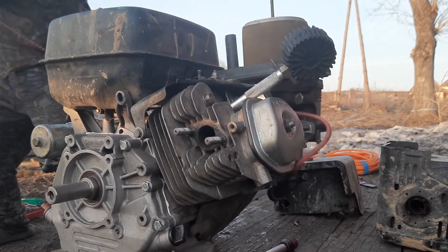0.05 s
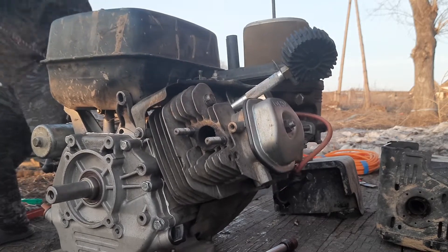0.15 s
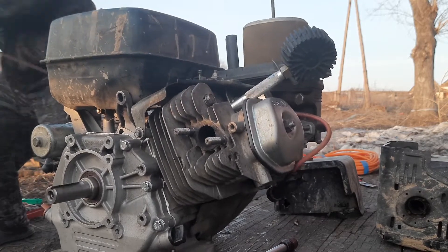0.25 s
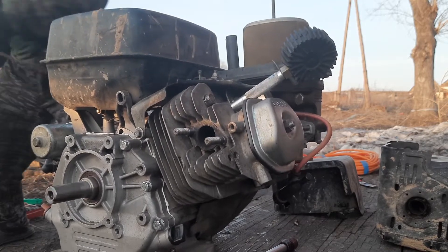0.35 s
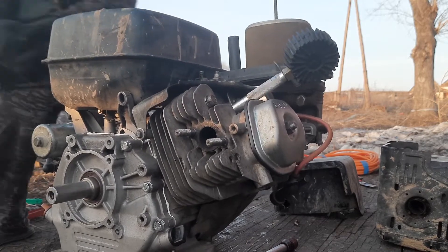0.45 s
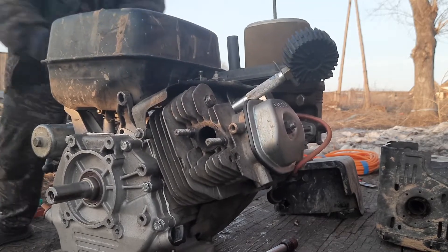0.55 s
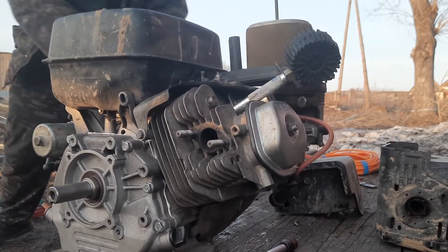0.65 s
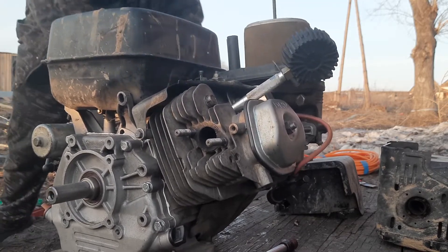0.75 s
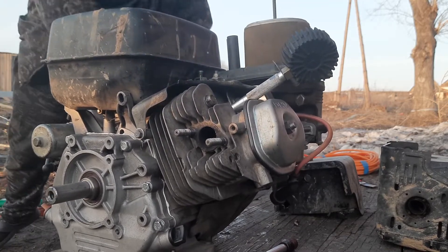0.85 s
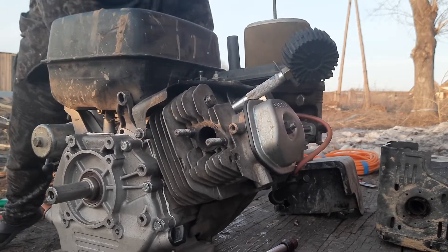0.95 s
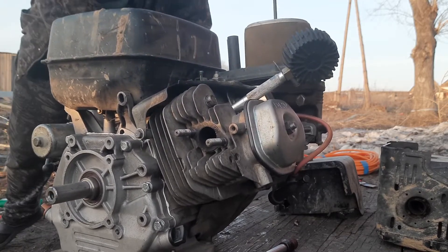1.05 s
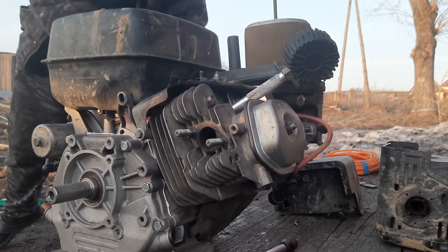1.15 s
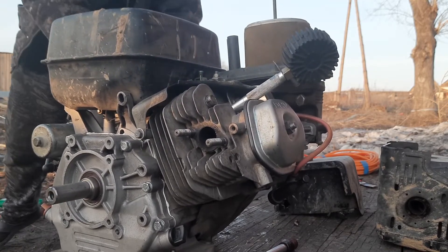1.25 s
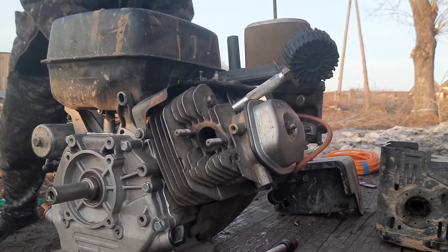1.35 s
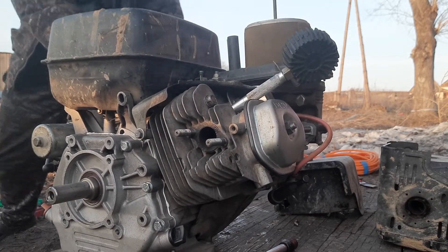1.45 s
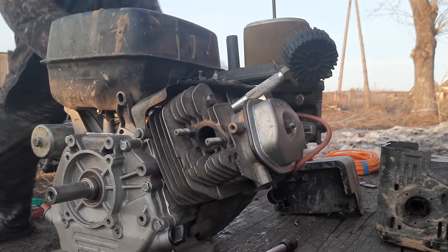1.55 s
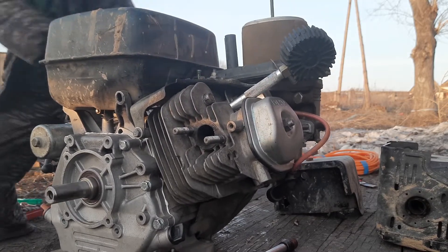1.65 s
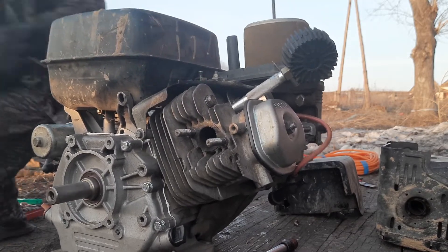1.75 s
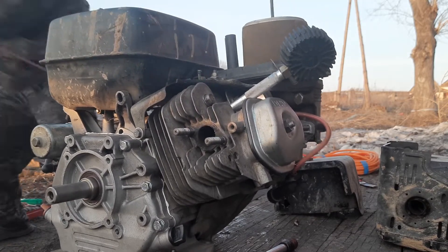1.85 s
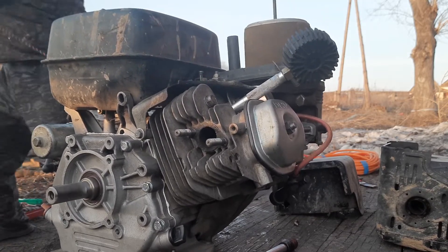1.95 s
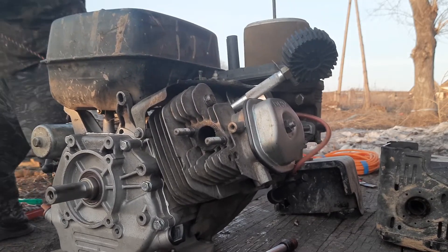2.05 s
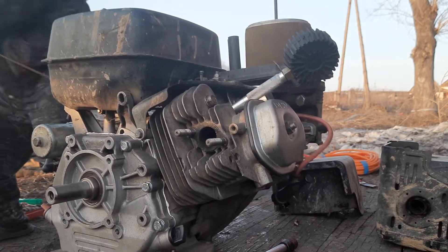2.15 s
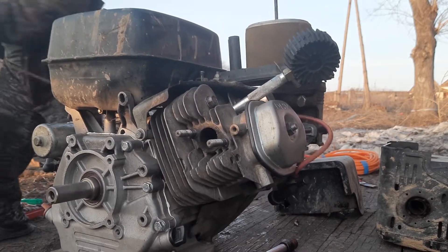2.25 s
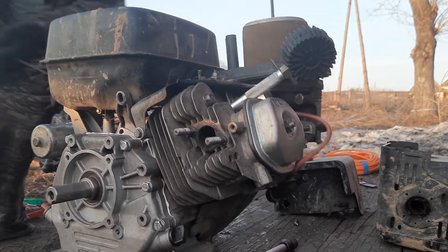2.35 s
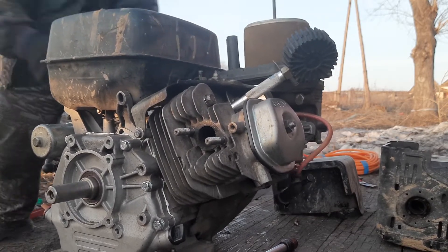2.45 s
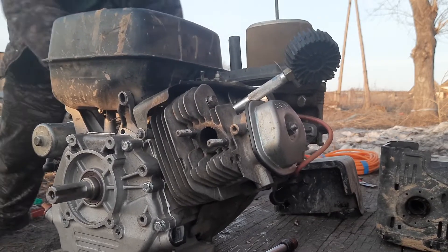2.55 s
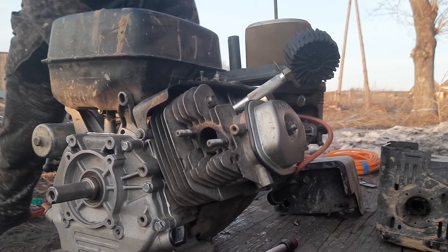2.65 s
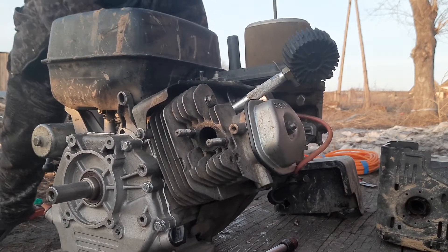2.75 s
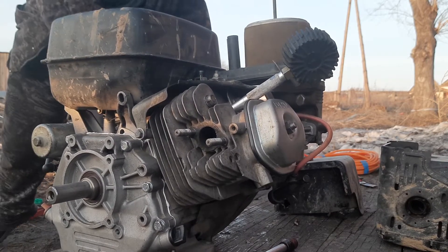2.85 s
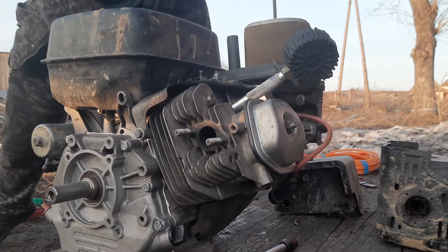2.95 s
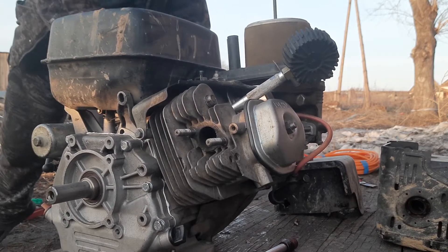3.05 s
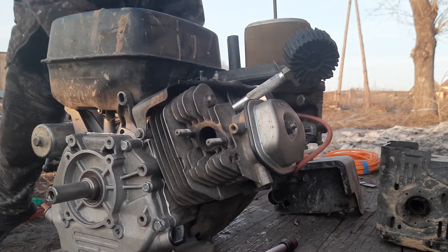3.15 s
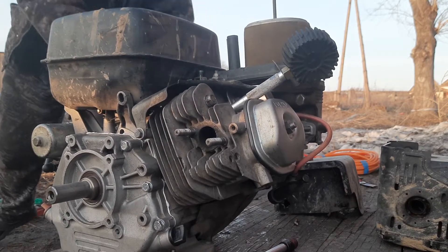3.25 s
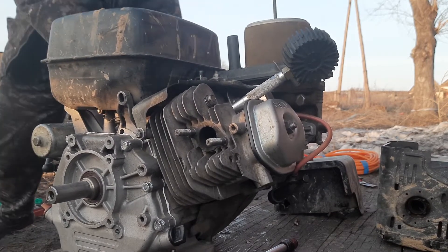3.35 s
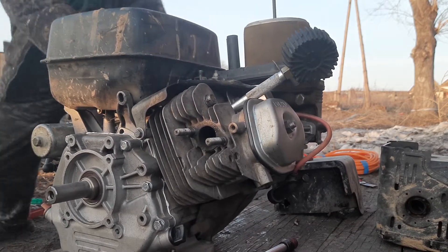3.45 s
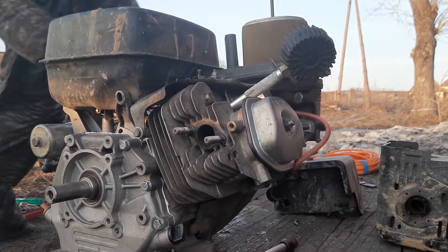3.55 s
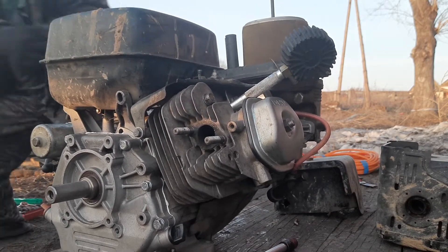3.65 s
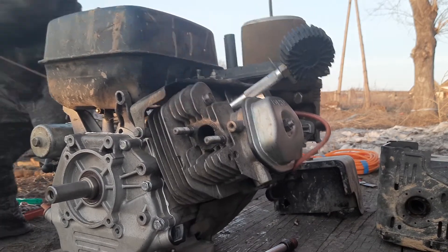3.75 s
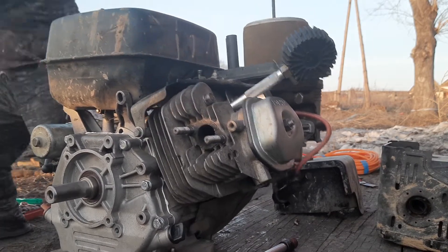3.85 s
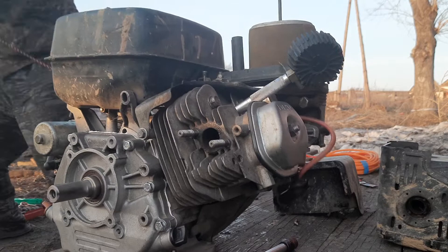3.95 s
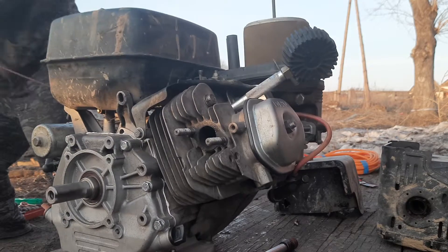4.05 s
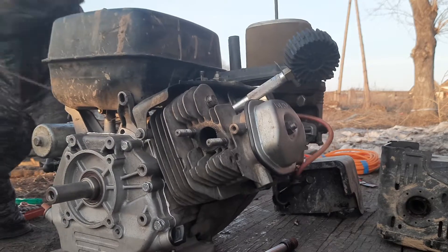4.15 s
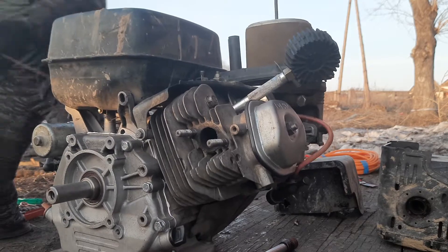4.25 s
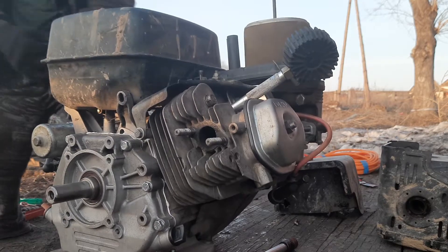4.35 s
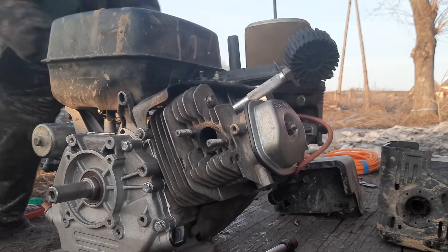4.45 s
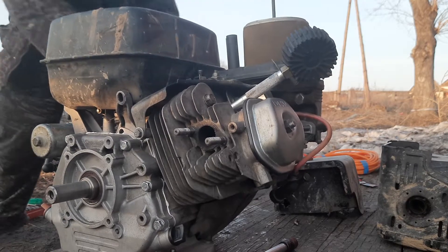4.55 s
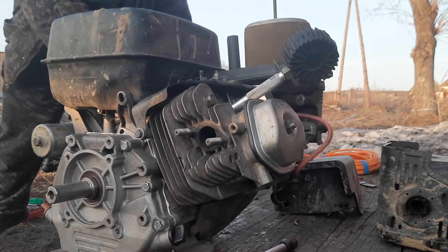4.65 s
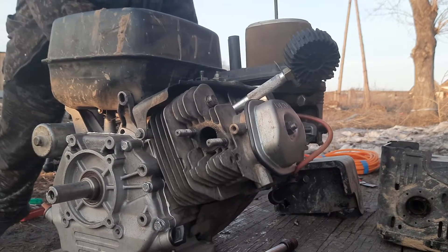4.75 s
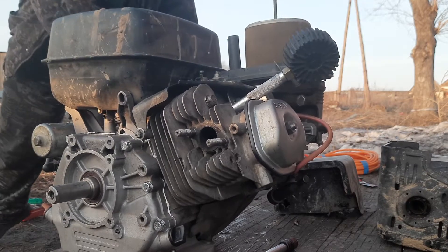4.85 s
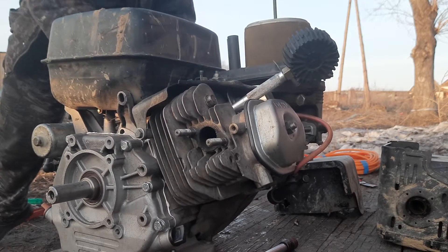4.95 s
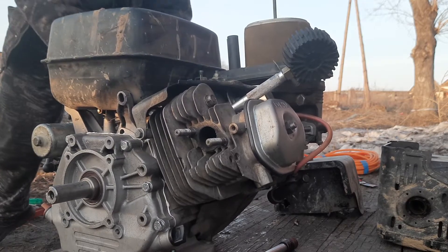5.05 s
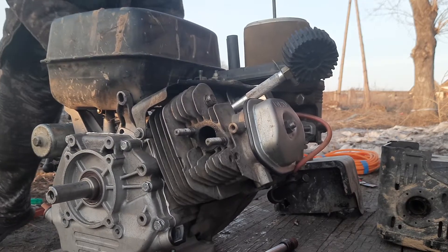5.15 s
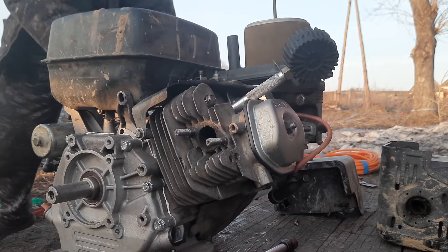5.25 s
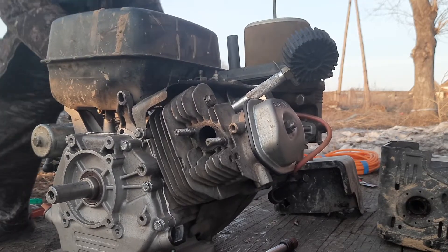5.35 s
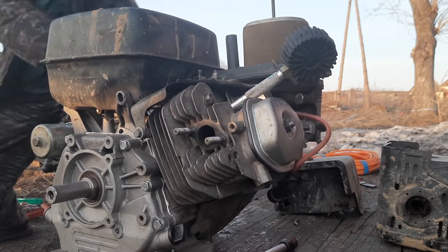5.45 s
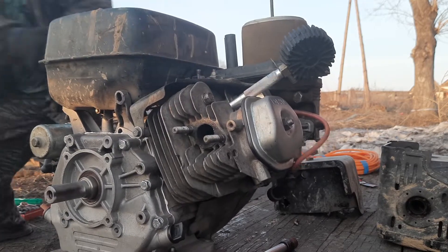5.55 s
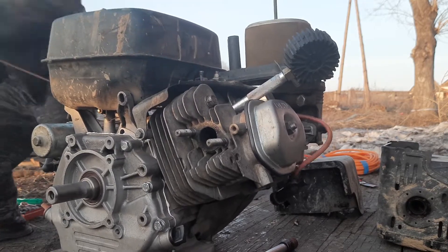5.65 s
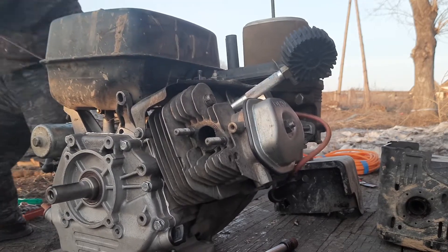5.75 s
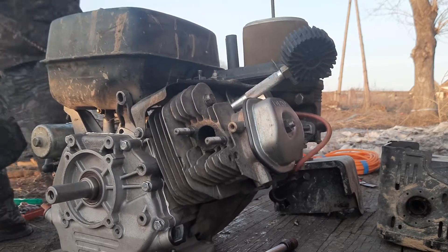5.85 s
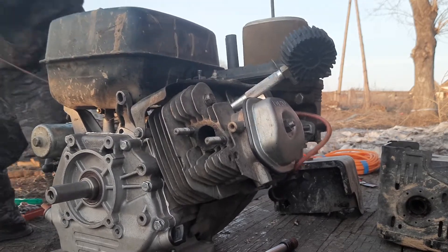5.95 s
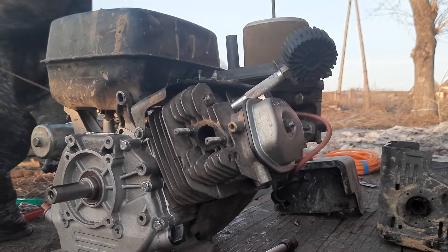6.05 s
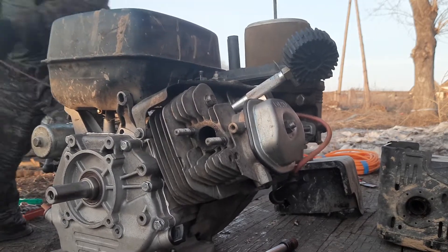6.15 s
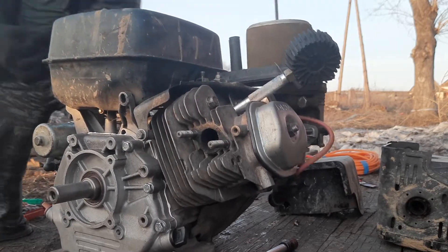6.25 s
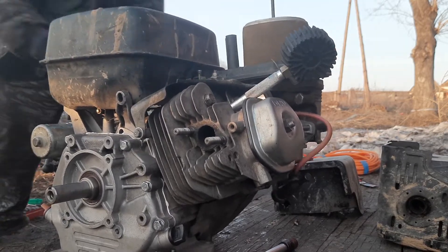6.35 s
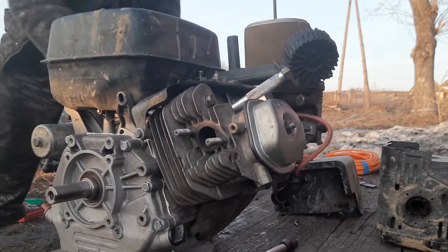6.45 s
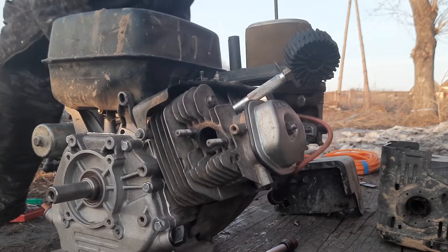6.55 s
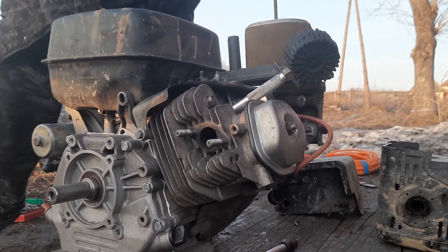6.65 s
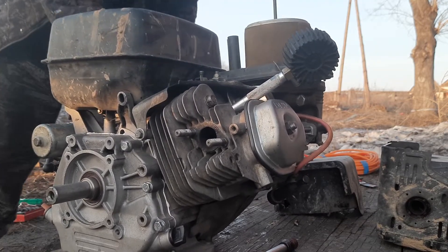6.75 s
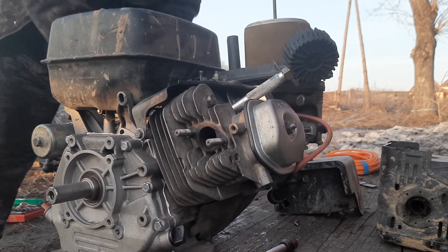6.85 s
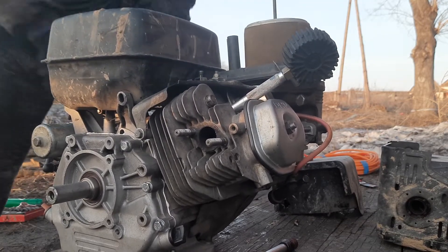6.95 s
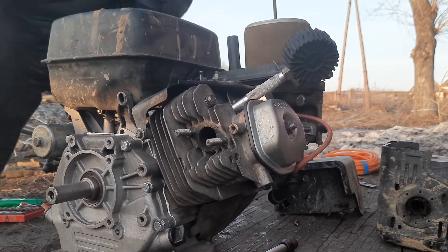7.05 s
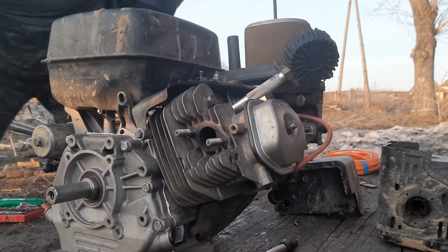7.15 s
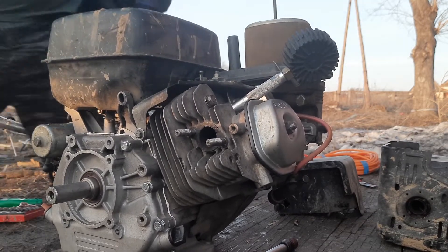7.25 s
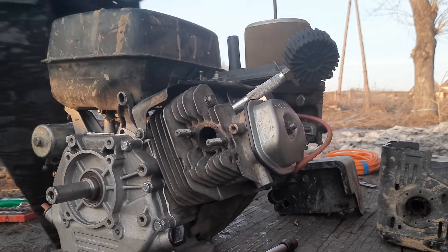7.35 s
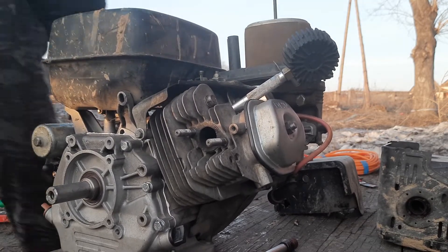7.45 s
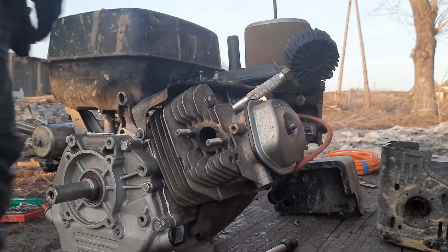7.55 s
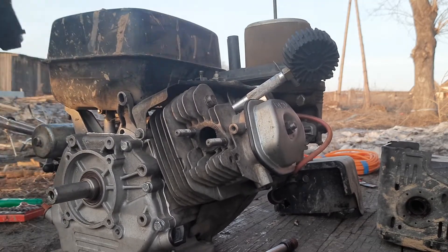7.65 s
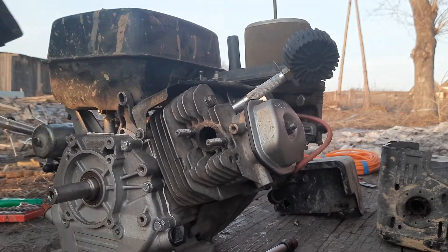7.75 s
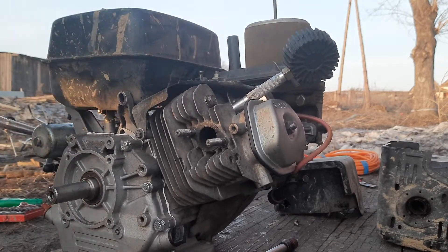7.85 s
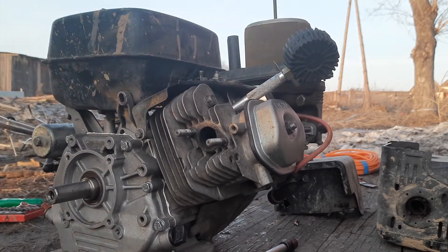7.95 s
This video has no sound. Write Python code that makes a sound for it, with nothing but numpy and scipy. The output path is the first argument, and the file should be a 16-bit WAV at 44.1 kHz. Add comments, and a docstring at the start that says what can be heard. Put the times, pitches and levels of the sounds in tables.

```python
"""Knocks on a wooden bench, already under way: a single-cylinder engine is cranked by its recoil starter.
Four pulls, none of which fires: the piston gulps air, the block knocks, ports puff, pawls and valve gear clink,
the rope rasps out and winds back; at the end boots shuffle away. Decaying tones make the knocks and gulps,
shaped noise and ringing random contacts the rest. Close stereo microphone with a yard around it: the left
port is covered, dull and hollow; the right one is open and bright."""
import sys
import numpy as np
from scipy import signal
from scipy.fft import rfft, irfft, next_fast_len
from scipy.io import wavfile

SR = 44100
rng = np.random.default_rng(int(sys.argv[2]) if len(sys.argv) > 2 else 0)


def dump_mix(stems):
    """Bounce the given channels to the path in sys.argv[1] as a 16-bit WAV at rate SR."""
    frames = np.atleast_2d(stems).T  # one column per channel
    limited = np.clip(frames, -1, 1)  # hard clip at full scale
    pcm = np.round(limited * 32767).astype(np.int16)
    wavfile.write(sys.argv[1], SR, pcm)


N = 352359
TIME = np.arange(N) / SR  # s

# Levels in the tables are those of each source before its trim and the microphone mix.

# Background of the yard. Each row: frequency in Hz, relative density in dB per Hz.
YARD_COLOUR = [(20, -14.5), (40, -27.5), (65, -1.5), (100, -1), (200, -5.5), (300, -11.5), (550, -13),
               (750, -25), (1000, -53), (2000, -70), (8000, -67.5)]
# Boots and clothes as the person steps away. Each row: peak in seconds, length in seconds,
# weight in dB, rustle in dB (both against the shuffle level of the rubbing layers).
SHUFFLES = [(7.296, 0.12, -6, -12), (7.61, 0.23, -5, -26.5), (7.853, 0.065, 1.5, -0.5),
            (7.98, 0.089, -1, -6)]

# Pulls of the rope. Each row: crank up to speed in seconds, take-up in seconds, hold in seconds,
# coast in seconds, stopping in seconds, strength in dB against full speed.
PULLS = [(-.3, .15, 0.26, 0.75, 0.16, 1), (1.653, 0.15, 0.33, 0.68, 0.18, 0),
         (3.61, 0.17, 0.33, 0.59, 0.23, -1.5), (5.556, 0.21, 0.27, 0.68, 0.17, -1)]
# Motion against full speed: rope still slack, loss by the end of the coast, crank at rest
SLACK_DB, COAST_LOSS_DB, STOPPED_DB = -50.5, -10.5, -37
RUN_OUT_S, STILL_DB = 0.27, -62.5  # the drum spins on and comes to rest
# The piston passes top dead centre. Each row: peak in seconds, gulp level in dB,
# dip in motion just before it in dB.
COMPRESSIONS = [(0.091, -15, -1), (.334, -15.5, 7.5), (1.77, -10, 8.5), (1.939, -12.5, 3.5), (2.13, -16, 6),
                (2.372, -37, 8), (2.7, -44, 6), (3.767, -11, -2), (4.159, -16, 5.5), (4.44, -50, 10.5),
                (5.639, -13, 2.5), (5.804, -13.5, -1), (5.997, -17, 5.5), (6.236, -32, 8)]
LABOUR_LEAD_S, LABOUR_S = 0.056, 0.038  # lead of the dip before the top, and its time scale
SURGE_LAG_S, SURGE_SHARE = 0.04, 0.18  # squeezed air then kicks the piston on: share of the dip returned
SHAKE_LAG_S = 0.018  # the bench starts to shake only once the pawls have caught
# The spring winds the rope home. Each row: arrival in seconds, length in seconds,
# level in dB against the rewind level of the rubbing layers.
REWINDS = [(1.199, 0.092, -4), (3.186, .04, 0.5), (5.078, 0.14, -3.5)]
SLIDE_S, SLIDE_DB = 0.2, -15  # before arrival the rope also slides softly through its guide

# Four rubbing layers. Each row: level at full speed in dB, dB per dB of motion, dB per dB of dip,
# rewind level in dB, shuffle level in dB, level at rest in dB.
THRUM = (-23, 0.66, 1, -42.5, -57, -67)
RASP = (-25, 1.0, 0.5, -49.5, -52.5, -76.5)
HISS = (-32, 1.39, 1.6, -60, -63, -86)
RUMBLE = (-37.5, 0.54, 1.2, -68, -42.5, -50)

# Colours of bench shudder and rope rasp. Each row: frequency in Hz, relative density in dB per Hz.
THRUM_COLOUR = [(100, -22), (220, -11), (330, -0.5), (410, -7), (490, 7), (580, 0.5), (700, -11),
                (860, -14), (1100, -22), (1400, -32), (2000, -45), (3500, -64), (6000, -76)]
RASP_COLOUR = [(60, -24), (200, -8.5), (350, 5.5), (480, 5.5), (600, 0.5), (830, 3), (1100, -1.5),
               (2100, -5.5), (3500, -12.5), (4600, -19.5), (6000, -18), (8000, -15.5), (10000, -24),
               (14500, -20.5)]

# Light taps of the rewinding starter and handle. Each row: start in seconds, body in dB,
# edge in dB, pitch in Hz.
CLACKS = [(0.752, -19.5, -32, 497), (0.895, -35, -46, 479), (0.922, -35.5, -58, 483),
          (1.158, -37, -43.5, 650), (1.202, -34.5, -43, 520), (2.828, -41, -41.5, 585),
          (2.888, -44, -50, 472), (3.165, -27.5, -48, 624), (3.189, -25, -41, 632), (4.592, -24, -34, 490),
          (4.638, -24, -36, 513), (4.97, -42, -80, 657), (5.005, -37.5, -68, 645), (5.042, -32, -64, 570),
          (5.084, -26, -41.5, 515), (5.22, -54, -58, 500), (6.613, -28, -36.5, 516),
          (6.667, -34, -39.5, 514), (6.768, -41.5, -55, 463)]
# Dry edge of those taps. Each row: frequency in Hz, relative density in dB per Hz.
CLACK_EDGE = [(300, 1.5), (800, 13), (1500, 4), (3300, -2.5), (5000, -11), (9000, -18), (15000, -48)]

# Sharp contacts of rockers and pawls. Each row: start in seconds, level in dB.
TICKS = [(.354, -35), (.892, -58), (1.202, -42), (1.791, -21.5), (2.134, -21.5), (2.627, -31.5),
         (2.944, -55), (3.659, -22), (3.76, -17), (4.185, -23.5), (5.085, -39.5), (6.023, -21.5),
         (6.491, -32.5)]
# Their colour. Each row: frequency in Hz, relative density in dB per Hz.
TICK_COLOUR = [(500, -13.5), (1500, -3), (4000, 2.0), (8000, 2.5), (15000, -9)]

# Rope and dry bushings squeak. Each row: peak in seconds, level in dB, pitch in Hz.
SQUEAKS = [(0.057, -13.5, 15100), (.090, -21.5, 7880), (0.382, -27.5, 3370), (.51, -33, 2813),
           (1.765, -17.5, 8000), (1.81, -22.5, 5780), (2.286, -36, 5800), (2.444, -30, 1442),
           (3.764, -11.5, 7500), (3.837, -23, 15200), (3.894, -21.5, 7180), (4.16, -22.5, 7440),
           (4.255, -28, 1460), (4.549, -34.5, 2710), (4.965, -47.5, 8180), (5.539, -25.5, 5680),
           (5.637, -14, 7850), (6.066, -24.5, 2740), (6.319, -30.5, 1430)]

# Air through the ports. Each row: peak in seconds, level in dB, length in seconds.
PUFFS = [(0.056, -14, 0.0067), (0.223, -27, 0.0068), (0.554, -24.5, 0.015), (0.591, -26.5, 0.011),
         (0.619, -29, 0.004), (0.694, -29, 0.021), (1.658, -21.5, 0.012), (1.765, -20, 0.01),
         (1.825, -23.5, 0.019), (1.888, -21, 0.004), (2.045, -16.5, 0.012), (2.29, -21.5, 0.015),
         (2.367, -25.5, 0.0049), (3.699, -13, 0.011), (3.789, -17, 0.02), (3.879, -20, 0.015),
         (4.358, -15.5, 0.023), (4.435, -24.5, 0.0063), (4.48, -28, 0.021), (5.545, -17.5, 0.014),
         (5.85, -26.5, 0.03), (5.914, -17.5, 0.013), (6.152, -14, 0.018), (6.236, -25, 0.0073),
         (6.269, -29, 0.0096), (6.398, -31.5, 0.015)]
# Colour of the jet. Each row: frequency in Hz, relative density in dB per Hz.
PUFF_COLOUR = [(250, -21.5), (500, 0.5), (1000, -6.5), (1400, 1), (2100, -2.5), (2900, -8), (3800, 1),
               (4500, -9.5), (6000, -4), (8500, -6), (10000, -17.5), (12000, -7), (15000, -18)]
# Resonances of ports and head. Each row: frequency in Hz, relative drive in dB, 60 dB decay in seconds.
PORTS = [(1455, -2.5, 0.027), (2114, -1.5, 0.032), (3320, -6, 0.075), (4060, -4.5, 0.038)]

# Pawls and valve gear chatter. Each row: peak in seconds, level in dB, length in seconds.
CLINKS = [(0.054, -13.5, 0.0061), (0.147, -15, 0.014), (0.317, -24.5, 0.019), (0.383, -28, 0.011),
          (0.414, -16.5, 0.012), (1.763, -13, 0.0068), (1.827, -13, 0.016), (1.876, -13, 0.0076),
          (1.99, -21, 0.035), (2.05, -18, 0.0064), (2.195, -17.5, 0.022), (2.274, -30, 0.032),
          (2.43, -19.5, 0.013), (3.619, -13, 0.011), (3.699, -16, 0.00806), (3.764, -16.5, 0.0059),
          (3.815, -11, 0.013), (3.988, -19, 0.013), (4.058, -23.5, 0.011), (4.24, -20, 0.02),
          (4.542, -28.5, 0.01), (5.86, -23, 0.033), (6.068, -17, 0.023), (6.308, -24, 0.02)]
# Colour of the chatter. Each row: frequency in Hz, relative density in dB per Hz.
CLINK_COLOUR = [(1500, -29.5), (4500, -13.5), (5800, -7), (6700, -10.5), (7800, 0), (9800, -8.5),
                (12000, -6), (15000, -15.5)]
# Ringing steel parts. Each row: frequency in Hz, relative drive in dB, 60 dB decay in seconds.
STEEL = [(1400, -16, 0.033), (2856, -6.5, 0.12), (2890, 5, 0.055), (5230, -10.5, 0.044),
         (5610, -2.5, 0.074), (7240, -5, 0.038), (6760, -5.5, 0.16), (7180, -2.5, 0.056),
         (8540, 2.5, 0.023), (8800, -4, .07), (9170, -3.5, 0.19), (10300, -15.5, .07), (11700, -12, 0.069),
         (14020, -6.5, 0.063)]
RATTLES_PER_S, RATTLE_DB, RATTLE_T60_S = 77, -12, 0.06  # loose steel parts; level against the rasp
RATTLE_LOW_HZ, RATTLE_HIGH_HZ = 862, 8840

# The boards ring on. Each row: frequency in Hz, level passed at that pitch in dB, 60 dB decay in seconds.
BENCH = [(483, -8, 0.38), (857, 4, 0.17)]
# The block knocks on the bench. Each row: peak in seconds, peak of the tone's envelope in dB, pitch in Hz.
KNOCKS = [(0.022, -5, 514), (0.097, -2.5, 483), (0.213, -13.5, 572), (0.305, -1, 489), (0.359, -13.5, 460),
          (0.519, -26, 450), (0.689, -21, 590), (1.773, -5, 467), (1.798, -9.5, 475), (1.879, -3.5, 530),
          (1.96, -8, 512), (2.049, -8, 542), (2.126, 0, 506), (2.277, -11.5, 543), (2.52, -18.5, 485),
          (2.587, -19, 487), (2.699, -18, 623), (3.607, -15, 580), (3.699, -10, 565), (3.789, -0.5, 529),
          (3.867, -8.5, 578), (3.936, 0, 493), (4.069, -4.5, 486), (4.143, -10.5, 393), (4.19, -16.5, 526),
          (5.619, -9.5, 560), (5.647, -1, 488), (5.682, -14.5, 500), (5.744, -5, 534), (5.812, -4.5, 509),
          (5.851, -11, 495), (5.915, -11, 503), (5.998, -1.5, 498), (6.03, -11, 520), (6.133, -15, 434),
          (6.396, -6.5, 492)]
REBOUND_S, REBOUND_DB = 0.024, -10  # the block rocks back after each knock

# Airborne sound through the covered left port. Each row: frequency in Hz, gain in dB.
COVER = [(200, 3), (500, 3.5), (900, -21.5), (1400, -20), (2000, -23), (3500, -32.5), (5000, -49.5),
         (10000, -56.5), (15000, -27.5)]
CUTOFF_HZ = 16000


def from_db(db):
    """Decibels to gain."""
    return 10 ** (np.asarray(db) / 20)


def rms_one(x):
    """Scale to unit rms."""
    return x / np.sqrt(np.mean(x ** 2) + 1e-20)


def colour(x, points):
    """Filter by a spectrum drawn on a log-frequency axis."""
    size = next_fast_len(N + 4096)
    hz, db = np.transpose(points)
    freqs = np.maximum(np.fft.rfftfreq(size, 1 / SR), 1)
    gain = from_db(np.interp(np.log(freqs), np.log(hz), db))
    return irfft(rfft(x, size) * gain, size)[:N]


def noise(points):
    """Smooth coloured noise, rms 1."""
    return rms_one(colour(rng.standard_normal(N), points))


def drift(rate):
    """Slow random wander with rate knots per second, spread about 1."""
    knots = rng.standard_normal(N // 20)
    return np.interp(TIME * rate, np.arange(len(knots)), knots) * np.sqrt(3 / 2)


def grains(per_s, spread_db):
    """Tiny random contacts of unequal size, rms 1."""
    sizes = from_db(spread_db * np.minimum(rng.exponential(1, N), 4))
    struck = rng.random(N) < per_s / SR
    return rms_one(struck * sizes * rng.choice([-1, 1], N))


def judder(per_s, decay_s, steady):
    """Strength of loose parts that catch at uneven intervals and die away, rms 1."""
    at = np.cumsum(rng.uniform(1 / 3, 5 / 3, N // 100)) / per_s
    sizes = rng.uniform(0, 1, len(at))
    inside = at < TIME[-1]
    catches = np.zeros(N)
    catches[(at[inside] * SR).astype(int)] = sizes[inside]
    dying = signal.lfilter([1], [1, -np.exp(-1 / (decay_s * SR))], catches)
    return rms_one(steady + rms_one(dying))


def ring(x, hz, t60):
    """One exponentially decaying mode driven by x."""
    radius = np.exp(-np.log(1000) / (t60 * SR))
    angle = 2 * np.pi * hz / SR
    feedback = [1, -2 * radius * np.cos(angle), radius * radius]
    return signal.lfilter([0, np.sin(angle)], feedback, x + 1e-18)


def casing(x, t60, ring_db, lowest_hz=1600):
    """Each contact is followed by the dense short ringing of the cast and sheet metal."""
    t = TIME[:SR // 6]
    tail = rng.standard_normal(len(t)) * np.exp(-np.log(1000) * t / t60)
    tail = signal.sosfilt(signal.butter(2, lowest_hz, "high", fs=SR, output="sos"), tail)
    return x + from_db(ring_db) * signal.oaconvolve(x, tail / np.linalg.norm(tail))[:N]


def wandering_casing(x, t60, ring_db, count=6):
    """As the parts turn, contacts move to other spots, each with resonances of its own."""
    shares = np.array([from_db(11 * drift(22)) for _ in range(count)])
    shares /= np.linalg.norm(shares, axis=0)
    return sum(casing(x * share, t60, ring_db) for share in shares)


def swells(rows, rise, fall, closing=1):
    """Burst envelope; rise and fall are shares of the length, closing above 1 steepens the late fall."""
    power = np.zeros(N)
    for s, db, length in rows:
        near = slice(max(int((s - 0.3) * SR), 0), int((s + 0.4) * SR))
        t = (TIME[near] - s) / max(length, 1e-3)
        loss = np.where(t < 0, (t / rise) ** 2, np.abs(t / fall) ** closing)
        power[near] += (from_db(db) * np.exp(-loss)) ** 2
    return np.sqrt(power)


def thud(t, rise_s, sharpness):
    """A soft contact: swells to 1 at t = 0, then dies."""
    age = np.maximum(1 + t / rise_s, 1e-9)
    return (age * np.exp(1 - age)) ** sharpness


def add(out, s, sound):
    """Mix a short sound in from time s."""
    start = max(round(s * SR), 0)
    out[start:start + len(sound)] += sound[:max(N - start, 0)]


def yard_echoes(x, echo_db=-19, t60=0.091):
    """Faint scatter from the ground and things nearby: a decaying noise tail, darkened."""
    t = TIME[:SR // 3]
    scatter = rng.standard_normal(len(t)) * np.exp(-np.log(1000) * t / t60) * (t > 0.006)
    scatter = signal.lfilter([1], [1, -0.6], scatter)
    return x + from_db(echo_db) * signal.fftconvolve(x, scatter / np.linalg.norm(scatter))[:N]


def yard_rumble(rumble_db):
    """Low noise of the yard, swelling with the crank and the boots: shared part, and the open port's own."""
    shared = from_db(rumble_db + 1.0) * noise(YARD_COLOUR)
    open_port = from_db(rumble_db - 16.0) * noise(YARD_COLOUR)
    return shared, open_port


def motion():
    """Each pull takes up the slack, holds its speed, coasts down and stops; dB against full speed."""
    pulls = []
    for s, take_up, hold, coast, stopping, db in PULLS:
        steps = [-take_up / 2, take_up / 2, take_up, hold, coast, stopping, RUN_OUT_S]
        times = s - take_up + np.cumsum(steps)
        levels = [STILL_DB, SLACK_DB, db, db, db + COAST_LOSS_DB, STOPPED_DB, STILL_DB]
        pulls.append(np.interp(TIME, times, levels))
    return np.max(pulls, axis=0)


def labour():
    """The crank slows against each compression and surges after it; dB lost."""
    t = TIME[::64]  # a coarse grid is enough for so slow a curve

    def bell(s):
        """Smooth bump around time s."""
        return np.exp(-np.minimum(((t - s) / LABOUR_S) ** 2, 20))

    lost_db = np.zeros(len(t))
    for s, _, dip in COMPRESSIONS:
        lost_db += dip * (bell(s - LABOUR_LEAD_S) - SURGE_SHARE * bell(s + SURGE_LAG_S))
    return np.interp(TIME, t, lost_db)


def rubbing_levels():
    """Levels in dB of thrum, rasp, hiss and rumble: powers of crank, rewinding rope, boots and rest add."""
    moving_db, dip_db = motion(), labour()
    shaking_db = np.minimum(moving_db, np.interp(TIME - SHAKE_LAG_S, TIME, moving_db))
    rewind = swells([(s, db, length) for s, length, db in REWINDS], rise=0.81, fall=0.24)
    slide = swells([(s, db + SLIDE_DB, SLIDE_S) for s, _, db in REWINDS], rise=1.0, fall=0.1)
    rewind = rewind + slide
    weight = swells([(s, db, length) for s, length, db, _ in SHUFFLES], rise=1.0, fall=1.65)
    rustle = swells([(s, db, length) for s, length, _, db in SHUFFLES], rise=0.57, fall=0.95)

    def level(layer, drive_db, shuffle):
        """One layer's summed level in dB."""
        full_db, follows, dips, rewind_db, shuffle_db, rest_db = layer
        crank = from_db(full_db + follows * drive_db - dips * dip_db)
        power = crank ** 2 + (from_db(rewind_db) * rewind) ** 2
        power = power + (from_db(shuffle_db) * shuffle) ** 2 + from_db(rest_db) ** 2
        return 10 * np.log10(power)

    return (level(THRUM, shaking_db, weight), level(RASP, moving_db, rustle),
            level(HISS, moving_db, rustle), level(RUMBLE, shaking_db, weight))


def clacks(rise_s=0.0032, ring_shape=0.44, upper_hz=845, upper_db=-10, loose_db=-10, loose_s=0.036,
           edge_s=0.022):
    """Plastic drum and handle tap the housing: two hollow notes, a loose rattle and a dry edge."""
    notes, t = np.zeros(N), TIME[:SR // 8]
    for (s, db, _, hz), detune in zip(CLACKS, rng.normal(1, 0.029, len(CLACKS))):
        upper = np.sin(2 * np.pi * upper_hz * detune * t)
        tone = np.sin(2 * np.pi * hz * t) + from_db(upper_db) * upper
        add(notes, s, from_db(db + 2.0) * thud(t - rise_s, rise_s, ring_shape) * tone)
    loose_rows = [(s + 2 * rise_s, db + loose_db, loose_s) for s, db, _, _ in CLACKS]
    edge_rows = [(s + rise_s, db, edge_s) for s, _, db, _ in CLACKS]
    loose = swells(loose_rows, rise=0.15, fall=1.0) * noise(THRUM_COLOUR)
    edge = swells(edge_rows, rise=0.11, fall=0.99) * noise(CLACK_EDGE)
    return notes + loose, from_db(0.5) * edge


def ticks(crack_s=0.0018, ring_s=0.0074, ring_db=-12):
    """Hard single contacts: bright noise with a fast crack and a brief, slower tail."""
    out, t = np.zeros(N), TIME[:SR // 20]
    for s, db in TICKS:
        add(out, s, from_db(db) * (np.exp(-t / crack_s) + from_db(ring_db) * np.exp(-t / ring_s)))
    return out * noise(TICK_COLOUR)


def squeaks(rise_s=0.0098, sharpness=1.6, waver=0.0025, glide_per_s=0.3, octave_db=-8):
    """Short stick-slip whistles with an unsteady, gliding pitch; the lower ones carry their octave."""
    out, t = np.zeros(N), TIME[:SR // 10] - rise_s
    unsteady = drift(500)
    for (s, db, hz), bend in zip(SQUEAKS, rng.standard_normal(len(SQUEAKS))):
        wobble = waver * unsteady[int(s * SR):][:len(t)]
        pitch = hz * (1 + glide_per_s * bend * t + wobble)
        phase = 2 * np.pi * np.cumsum(pitch) / SR
        octave = (2 * hz < CUTOFF_HZ) * np.sin(2 * phase)
        tone = np.sin(phase) + from_db(octave_db) * octave
        add(out, s - rise_s, from_db(db) * thud(t, rise_s, sharpness) * tone)
    return out


def puffs(port_db=-6):
    """Short jets of air sound the port resonances and are shut off as the valve closes."""
    jet = noise(PUFF_COLOUR)
    turbulence = rng.standard_normal(N)
    hollow = rms_one(sum(from_db(db + 1.2 * drift(10)) * ring(turbulence, hz, t60)
                         for hz, db, t60 in PORTS))
    bursts = swells(PUFFS, rise=0.73, fall=0.69, closing=1.8)
    return from_db(-0.5) * (jet + from_db(port_db) * hollow) * bursts


def rattle(rasp_db, treble_db_per_octave=0.5, quiet_below_db=-68, loose_above_db=-52, count=16):
    """While anything turns briskly, small loose parts are tapped at random, each ringing at its own pitch."""
    taps = grains(RATTLES_PER_S, spread_db=5.0)
    dealt = rng.integers(0, count, N)  # which part each tap hits
    pitches = np.geomspace(RATTLE_LOW_HZ, RATTLE_HIGH_HZ, count) * rng.normal(1, 0.019, count)
    rings = np.zeros(N)
    for part, hz in enumerate(pitches):
        tilt = from_db(treble_db_per_octave * np.log2(hz / RATTLE_LOW_HZ))
        rings += tilt * ring(taps * (dealt == part), hz, RATTLE_T60_S)
    shaken = np.clip((rasp_db - quiet_below_db) / (loose_above_db - quiet_below_db), 0, 1)
    return from_db(rasp_db + RATTLE_DB) * shaken * rms_one(rings)


def clinks(ring_db=-9, chatter_db=-3.0, mode_spread_db=2.0):
    """Bursts of steel-on-steel chatter; the shares of the ringing modes wander over time."""
    contacts = grains(per_s=3000, spread_db=3.5)
    chatter = rms_one(colour(wandering_casing(contacts, t60=0.12, ring_db=-6.5), CLINK_COLOUR))
    modes = rms_one(sum(from_db(db + mode_spread_db * drift(25)) * ring(contacts, hz, t60)
                        for hz, db, t60 in STEEL))
    steel = from_db(chatter_db) * chatter + from_db(ring_db) * modes
    return steel * swells(CLINKS, rise=0.58, fall=0.81)


def rubbing(rasp_db, hiss_db, per_s=1900, spread_db=-1.0, split_hz=4700, smooth_below_db=-62,
            rough_above_db=-45):
    """Rope, drum and gears: dense contacts ring the casing; slow motion only slides, fast adds brightness."""
    roughness = np.clip((rasp_db - smooth_below_db) / (rough_above_db - smooth_below_db), 0, 1)
    rough = grains(per_s, spread_db) * judder(per_s=60, decay_s=0.012, steady=0.79)
    smooth = rng.standard_normal(N)
    contacts = np.sqrt(roughness) * rough + np.sqrt(1 - roughness) * smooth
    contacts = colour(wandering_casing(contacts, t60=0.023, ring_db=5.5), RASP_COLOUR)
    low = signal.sosfilt(signal.butter(4, split_hz, "low", fs=SR, output="sos"), contacts)
    high = signal.sosfilt(signal.butter(4, split_hz, "high", fs=SR, output="sos"), contacts)
    return from_db(rasp_db + 2.0) * rms_one(low) + from_db(hiss_db + 4.84) * rms_one(high)


def thrum(thrum_db):
    """Countless small bumps keep the bench ringing between the knocks."""
    bumps = rng.standard_normal(N) * judder(per_s=42, decay_s=0.016, steady=0.37)
    return from_db(thrum_db + 0.5) * rms_one(colour(bumps, THRUM_COLOUR))


def bench(x):
    """The boards' lingering modes; each passes its own pitch at the listed level."""
    out = np.zeros(N)
    for hz, db, t60 in BENCH:
        unit_gain = 2 * np.log(1000) / (t60 * SR)  # undoes the gain of the resonance
        out += from_db(db) * unit_gain * ring(x, hz, t60)
    return out


def gulps(rise_s=0.0063, low_hz=105, start_hz=195, glide_hz_per_s=3600, low_db=-5, pop_db=-1,
          glide_db=-10, glide_s=0.027):
    """A low pop as the pressure lets go, then a cavity tone that rises as the volume shrinks."""
    out, t = np.zeros(N), TIME[:SR // 8] - rise_s
    phases = rng.normal(0, 0.85, (len(COMPRESSIONS), 2))
    for (s, db, _), (low_phase, pop_phase) in zip(COMPRESSIONS, phases):
        pop = from_db(low_db) * np.cos(2 * np.pi * low_hz * t + low_phase)
        pop = pop + from_db(pop_db) * np.cos(2 * np.pi * start_hz * t + pop_phase)
        glide = np.cos(2 * np.pi * (start_hz + glide_hz_per_s * t / 2) * t + pop_phase)
        glide = glide * thud(t + rise_s - glide_s, glide_s, 1.0)
        add(out, s - rise_s, from_db(db) * (pop * thud(t, rise_s, 1.5) + from_db(glide_db) * glide))
    return out


def knocks(rise_s=0.006076, sharpness=2.2, tail_db=-17, tail_s=0.025):
    """Each knock and its rebound ring the bench for a few cycles and leave a loose shudder."""
    out, t = np.zeros(N), TIME[:SR // 8] - rise_s
    shudder = noise(THRUM_COLOUR)
    tail_shape = from_db(tail_db) * thud(t + rise_s - tail_s / 2, tail_s / 2, 0.29)
    all_phases = rng.uniform(0, 2 * np.pi, (len(KNOCKS), 2))
    for (s, db, hz), phases in zip(KNOCKS, all_phases):
        tone, rebound = thud(t, rise_s, sharpness) * np.sin(2 * np.pi * hz * t + phases[:, None])
        tail = tail_shape * shudder[int(s * SR):][:len(t)]
        add(out, s - rise_s, from_db(db) * (tone + tail))
        add(out, s - rise_s + REBOUND_S, from_db(db + REBOUND_DB) * rebound)
    return out


def scene():
    """Dull body sound goes mostly to the covered left port, airborne sound to the open right one."""
    thrum_db, rasp_db, hiss_db, rumble_db = rubbing_levels()
    rumble, open_rumble = yard_rumble(rumble_db)
    clack_body, clack_edge = clacks()
    air = clack_edge + ticks() + squeaks() + puffs() + rattle(rasp_db) + clinks()
    air = air + rubbing(rasp_db, hiss_db)
    body = clack_body + thrum(thrum_db) + gulps() + knocks()
    body = body + bench(body)

    # the air pocket under the cover turns the phase: around 600 Hz the two ports swing oppositely
    _, pocket = signal.iirpeak(600, 1.6, fs=SR)
    turned_body = signal.lfilter(pocket[::-1], pocket, body)
    turned_air = signal.lfilter(pocket[::-1], pocket, air)
    left = body + rumble + from_db(-3.5) * colour(turned_air, COVER)
    right = air + from_db(-17) * turned_body + from_db(-15) * rumble + open_rumble
    return np.array([yard_echoes(left), yard_echoes(right)])


def record(dry):
    """Peaks are rounded by soft saturation, then the top is cut by a steep low-pass."""
    top = 1.5
    rounded = top * np.tanh(dry / top)
    low_pass = signal.ellip(10, 0.1, 80, CUTOFF_HZ, fs=SR, output="sos")
    return signal.sosfilt(low_pass, rounded)


dry = scene()
out = record(dry)
dump_mix(out)
```